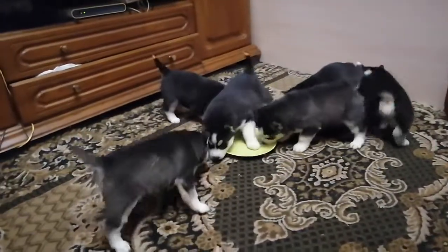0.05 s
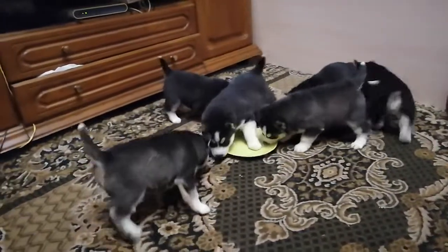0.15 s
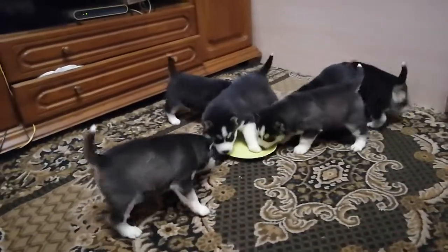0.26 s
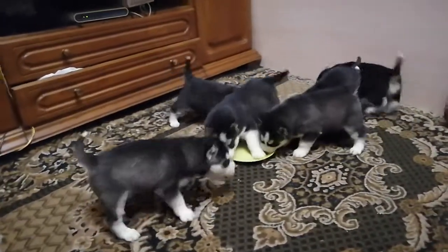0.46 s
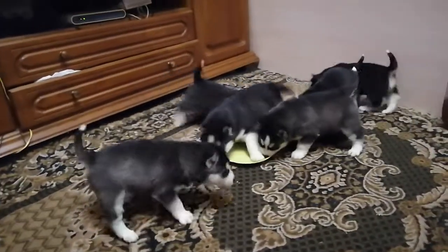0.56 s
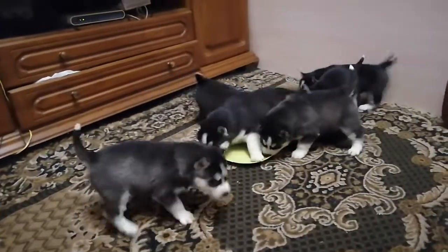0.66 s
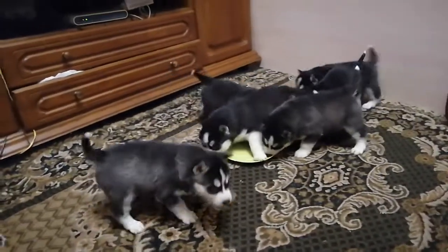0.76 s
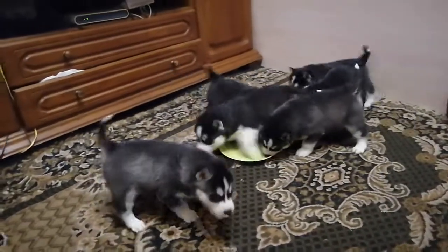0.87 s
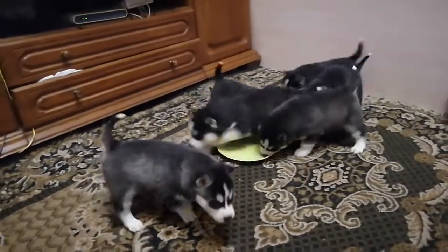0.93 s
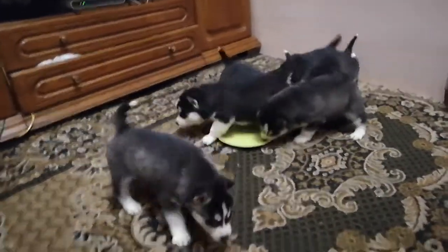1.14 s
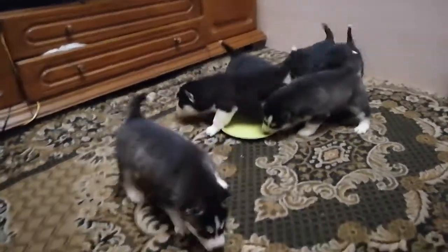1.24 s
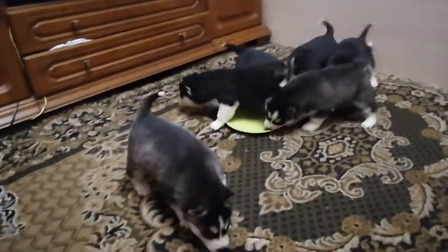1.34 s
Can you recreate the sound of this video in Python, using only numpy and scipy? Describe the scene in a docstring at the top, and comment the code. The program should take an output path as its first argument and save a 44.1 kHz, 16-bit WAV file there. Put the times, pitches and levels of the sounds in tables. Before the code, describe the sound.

Puppies yap close by in a small room with a slight echo. A lower yap at 0.2 seconds runs into a grumble and a shrill yap around 0.45. The loudest yap comes near 0.8 seconds, overlapped by a longer, hoarse one. A faint whimper follows at 1 second and a small yap at about 1.3. Paws thud and scuff softly on carpet underneath.

```python
"""In a small carpeted room, puppies yap over one another around a dish.
Each yap is a rising and falling tone from the vocal folds, shaped by the throat and mouth;
the loud ones start clear and turn hoarse. Walls and furniture echo the calls.
Paws thud and scuff on the carpet over the faint, steady noise of the room."""
import sys
import numpy as np
from scipy import signal
from scipy.fft import rfft, irfft, next_fast_len
from scipy.io import wavfile
from scipy.ndimage import uniform_filter1d, minimum_filter1d

SR = 44100
rng = np.random.default_rng(int(sys.argv[2]) if len(sys.argv) > 2 else 0)


def transcribe(signal):
    """Save signal, clipped to [-1, 1], as a 16-bit WAV file at the path in sys.argv[1]."""
    frames = np.atleast_2d(signal).T
    limited = np.clip(frames, -1, 1)
    pcm = np.round(limited * 32767).astype(np.int16)
    wavfile.write(sys.argv[1], SR, pcm)


N = 61739

# Tone colours of the background, the carpet noises and the difference between left and right.
# Each row: frequency in Hz, gain in dB.
ROOM_TONE = [(20, -13.5), (60, -2.5), (110, -13.5), (250, -28.5), (450, -29), (700, -32.5), (1200, -29.5),
             (2200, -28), (3500, -39.5), (9000, -46.5), (15000, -59)]
THUD_RUSTLE = [(25, -28), (70, -1), (130, -5), (300, -15), (600, -23), (2000, -62.5)]
SCUFF_COLOUR = [(100, -17.5), (250, 2), (650, 9.5), (950, -6), (1600, -11), (3000, -34.5), (8000, -45.5),
                (15000, -57.5)]
SIDE_COLOUR = [(100, -2.5), (300, -2.5), (700, -1.5), (1200, 0)]
# First echoes from floor, cabinet and walls. Each row: left delay in ms, right delay in ms, gain.
ECHOES = [(2.3, 2.9, 0.25), (6.4, 0.63, 0.037), (10.7, 16, 0.25), (17.3, 12, 0.23)]
# The room's lingering wash of echoes, and one thin tone that rings on with it.
# Each row: frequency in Hz, seconds for the lingering sound to fade by 60 dB, relative level in dB.
TAIL = [(150, 0.67, 3.5), (493, 1, -9.5), (1200, 0.31, 4.5), (2400, 0.3, 9), (4950, 0.94, -16.5),
        (8930, 0.36, 8.5)]
RINGS = [(3027, 0.3, -19.5)]
# Paw steps. Each row: time of the peak in seconds, pitch in Hz, level in dB, swell time in seconds.
THUDS = [(0.03, 68.1, -48, 0.077), (.038, 225, -41, 0.012), (0.344, 68.7, -41.5, 0.011),
         (0.395, 100.3, -46, 0.018), (0.738, 66, -40, 0.028), (0.999, 65.7, -61, 0.024),
         (1.049, 63.6, -49, 0.046), (1.085, 156, -39.5, 0.017), (1.175, 72.4, -42.5, 0.039),
         (1.218, 162, -48, 0.018), (1.276, 66.1, -53, 0.043)]
# Rubs on the carpet and at the dish.
# Each row: start in seconds, relative level in dB, fade time in seconds, treble boost in dB.
SCUFFS = [(0.009, -41, 0.015, 8.5), (0.026, -40, 0.0083, 7.5), (0.063, -49.5, 0.012, 17),
          (0.534, -44, 0.012, -22), (0.558, -38, 0.028, -13), (0.582, -39, 0.02, -42.5),
          (1.149, -46, 0.01, 19.5), (1.209, -55.5, 0.041, 0)]
# How each voice sound moves. Each row: time in seconds, pitch in Hz, relative level in dB,
# treble boost in dB, roughness from 0 to 1.
LOW_YAP = [(.176, 330, -42.5, -24, 0.09), (.187, 395.1, -35, -21.5, 0.16), (.195, 449.6, -32, -21, 0),
           (.200, 644.5, -24, -23.5, 0.22), (.205, 690, -24, -21.5, 0.25), (.209, 712, -26, -5, 0.25),
           (.220, 750, -24, -4, 0.19), (.236, 812, -26.5, 11.5, 0.2), (.243, 791.3, -27, 2, 0.58),
           (.266, 773.5, -24.5, -8, 0.83), (.272, 750, -35, -4.5, 0.65)]
GRUMBLE = [(.268, 344.3, -28.5, 0.0057, 0.041), (.282, 388.5, -26.5, 0.01, 0.057),
           (.302, 492.2, -33, 0, 0.34), (.322, 557.2, -25, 0.016, 0.13), (.345, 579.2, -33, 0.0056, 0.8),
           (.381, 671.3, -34.5, 0, 0.85), (.395, 530.2, -24, 0, 0.19), (.435, 455.5, -38, 0, 1)]
SHRILL_YAP = [(.348, 920, -40, -17.5, 0.28), (.366, 1044, -28.5, -35.5, 0.042),
              (.392, 919.7, -39, -21.5, 0.55), (.412, 1023, -21, -6.5, 0.076),
              (.430, 1121, -14.5, -4.5, 0.15), (.445, 1219, -16.5, 3, 0.38), (.456, 1284, -17.5, 12, 0.19),
              (.463, 1374, -10.5, -10.5, 0.16), (.474, 1501, -24.5, 10, 0.08),
              (.486, 1499, -25.5, 12.5, 0.13), (.495, 1361, -19.5, 1.5, 0.22), (.509, 1334, -29, -22, 0.5)]
LOUD_YAP = [(.697, 658, -48.5, -26.5, 0.047), (.708, 797, -37.5, 10, 0.078),
            (.717, 917.6, -36.5, 9.5, 0.079), (.729, 979.6, -35.5, 18, 0.14),
            (.737, 1062, -16.5, 0.5, 0.079), (.749, 1265, -10, 0.5, 0.057), (.760, 1409, -13, -1.5, 0.06),
            (.772, 1455, -18.5, 5.5, 0.088), (.785, 1280, -7, -6, 0.021), (.793, 1245, -10.5, -14.5, 0.11)]
LOUD_YAP_UNDERTONE = [(.722, 579.6, -31.5, -10, 0.4), (.738, 574, -40, -7, 1),
                      (.752, 600, -24, -10.5, 0.28), (.768, 611, -31.5, -0.5, 0.074)]  # a low tone near 600 Hz beneath the loud yap
LONG_YAP = [(.762, 994, -22, -18, 0.35), (.796, 1070, -19, -1, 0.65), (.812, 1260, -15, -8, 0.22),
            (.821, 1370, -23, 5, 0.22), (.833, 1540, -23, 3, 0.2), (.855, 1590, -27, 4, 0.22),
            (.874, 1500, -36, 11, .3), (.879, 1190, -24, -6, .05), (.898, 1040, -26.5, -4, 0.04),
            (.912, 880, -38, 2, 0.06)]
WHIMPER = [(.966, 645.4, -53.5, 0, 0.33), (.99, 712.7, -43, 0, 0.41), (1.035, 696.5, -49.5, 0.0095, 0.18),
           (1.06, 681, -61, 0, 0.31)]
SMALL_YAP = [(1.227, 750, -38.5, 1, 0.22), (1.236, 823, -32.5, 0, .1), (1.249, 900, -25, -3, 0.048),
             (1.265, 1003, -29, 4.5, 0.035), (1.278, 1006, -19, -9, 0.027), (1.290, 1036, -38, 11, .08)]
# How throat and mouth colour the calls. Each row: frequency in Hz, gain in dB.
LOW_THROAT = [(250, -36), (400, 2), (750, -0.5), (1100, 1.5), (1480, -3), (1850, -13.5), (2600, -19),
              (3250, -6), (4000, -17), (4850, -10.5), (5800, -21), (7400, -19), (10000, -38), (15000, -69)]
GRUMBLE_THROAT = [(200, -29), (400, -7.5), (700, -0.5), (1100, -6.5), (1400, -5), (1800, -41), (3000, -42),
                  (4400, -23), (7000, -37.5), (15000, -58)]
SHRILL_THROAT = [(300, -22.5), (700, -19.5), (1050, 0.5), (1450, -1), (1800, -7.5), (2500, -26),
                 (3000, -16.5), (3450, -18), (4400, -14.5), (5400, -14), (6200, -30.5), (8500, -36.5),
                 (15000, -71)]
LOUD_THROAT = [(400, -46), (650, 10), (1050, 0), (1450, -1.5), (1900, -6), (2650, -19.5), (3200, -11),
               (4300, -13.5), (5500, -8.5), (8500, -39), (10500, -48.5), (15000, -77)]
LONG_THROAT = [(450, -44.5), (750, -27.5), (980, 1.5), (1580, -4.5), (2000, -18), (2450, -14.5),
               (3150, -1.5), (3700, -4.5), (4700, -1.5), (6200, -19), (8500, -38.5), (15000, -69)]
CLOSED_THROAT = [(200, -20.5), (380, 0), (650, 0), (950, 0), (2000, -24), (15000, -55.5)]
SMALL_THROAT = [(300, -20), (750, -0.5), (1000, -5.5), (1700, -3), (2050, -24.5), (2700, -47),
                (3900, -20.5), (5000, -17.5), (6200, -32), (7500, -29), (10000, -77), (15000, -72.5)]
# The calls and the loud yap's undertone. Each row: movement table, throat table, left over right in dB,
# left delay in ms, echo in dB, share of half-pitch tones, mouth resonance in Hz, its boost in dB,
# top of the clear overtones in Hz.
VOICE_SOUNDS = [(LOW_YAP, LOW_THROAT, 0.44, 0.032, -5, 0.17, 8300, 0.68, 6500),
                (GRUMBLE, GRUMBLE_THROAT, -1.2, 0.14, -1.4, 0.81, 2600, 0.95, 7500),
                (SHRILL_YAP, SHRILL_THROAT, 1.3, 0.0092, -3.5, 1, 4980, 8.2, 8000),
                (LOUD_YAP, LOUD_THROAT, 1.1, 0.271, -5, 0.44, 4470, 9.9, 4660),
                (LOUD_YAP_UNDERTONE, CLOSED_THROAT, -1.6, 0.096, -12.5, .3, 600, 0, 6000),
                (LONG_YAP, LONG_THROAT, -8, 0.286, -2.5, 0.78, 10000, 1.3, 2970),
                (WHIMPER, CLOSED_THROAT, 0, 0.07, -2.9, 0.11, 3300, 3.4, 6000),
                (SMALL_YAP, SMALL_THROAT, 0.53, 0.058, -5, 0.125, 1800, 0, 9300)]

TOP_HZ = 15000
FREQS = np.arange(N // 2 + 1) * SR / N


def undb(db):
    """Turn decibels into a gain to multiply by."""
    return 10 ** (np.asarray(db) / 20)


def unit(x):
    """Scale a sound to an average power of 1."""
    return x / np.sqrt(np.mean(x ** 2) + 1e-18)


def gain_at(points, hz):
    """Read the gain of a tone colour table at the given frequencies."""
    f, db = np.array(points, float).T
    return undb(np.interp(np.log(hz + 1), np.log(f), db))


def colour(x, points):
    """Give a sound the tone colour in a table."""
    return irfft(rfft(x) * gain_at(points, FREQS), N)


def noise(points):
    """Make noise with the tone colour in a table."""
    return unit(colour(rng.standard_normal(N), points))


def treble_share(hz):
    """How much a frequency counts as treble: rises from 0 to 1 around 2200 Hz."""
    return 1 / (1 + (2200 / (hz + 1)) ** 6)


def brighten(x, treble_db):
    """Raise or lower the treble of a sound."""
    treble = irfft(rfft(x) * treble_share(FREQS), N)
    return x + (undb(treble_db) - 1) * treble


def wander(rate):
    """A smooth random wobble that changes about rate times a second."""
    return unit(irfft(rfft(rng.standard_normal(N)) / (1 + (2 * FREQS / rate) ** 2), N))


def delay(x, ms):
    """Make a sound arrive ms milliseconds later."""
    size = next_fast_len(N + 4096)
    hz = np.arange(size // 2 + 1) * SR / size
    return irfft(rfft(x, size) * np.exp(-2j * np.pi * hz * ms / 1000), size)[:N]


def room_tone():
    """A faint, steady rumble and hiss, a little different on each side."""
    middle, side = noise(ROOM_TONE), noise(ROOM_TONE)
    return undb(-58.5) * (middle + 0.51 * np.array([side, -side]))


def room_echoes(x):
    """Walls and furniture send back a few echoes, then a wash that drops quickly and lingers softly."""
    size = 32768
    t, f = np.arange(size) / SR, np.arange(size // 2 + 1) * SR / size
    hiss = rfft(rng.standard_normal((2, size)))
    centres = np.log([row[0] for row in TAIL])
    onset = np.clip(t / 0.0041 - .5, 0, 1)
    quick_drop = 8.1 * 1000 ** (-t / 0.2)  # falls 60 dB in 0.2 seconds
    tail = 0
    for this_band, (_, fade_s, db) in zip(np.eye(len(TAIL)), TAIL):
        band = irfft(hiss * np.interp(np.log(f + 1), centres, this_band))
        fade = (1000 ** (-t / fade_s) + quick_drop) * onset
        tail = tail + undb(db) * band * fade / np.sqrt(np.sum(fade ** 2))
    for hz, fade_s, db in RINGS:
        ring = 1000 ** (-t / fade_s) * np.sin(2 * np.pi * (hz * t + rng.random((2, 1))))
        tail = tail + undb(db) * unit(ring) / np.sqrt(size)
    early = sum(gain * np.array([delay(x, left), delay(x, right)]) for left, right, gain in ECHOES)
    return early + signal.fftconvolve(x[None], tail, axes=1)[:, :N]


def paw_thuds(t):
    """Each step makes the floor thud, with a dull rustle of the carpet."""
    thuds, weight = 0, 0
    for peak, hz, db, swell_s in THUDS:
        press = undb(db) * np.exp(-((t - peak) / swell_s) ** 2)
        thuds += press * np.sin(2 * np.pi * hz * (t - peak) + rng.uniform(0, 2 * np.pi))
        weight += press
    return thuds + undb(-9.5) * weight * noise(THUD_RUSTLE)


def scuffs(t):
    """Paws and muzzles rub, making short bursts of noise."""
    out, rise_s = 0, 0.012
    for start, db, fade_s, treble_db in SCUFFS:
        age = np.maximum(t - start, 0)
        burst = (1 - np.exp(-age / rise_s)) * np.exp(-age / fade_s)
        out += undb(db) * burst * brighten(noise(SCUFF_COLOUR), treble_db)
    return 2 * out


def yap(t, curve, throat, half_share, mouth_hz, mouth_db, clear_hz):
    """Vocal folds buzz through the throat and a mouth that opens with effort; rough ones shake and rasp."""
    times, *columns = np.array(curve, float).T
    hz, db, treble_db, rough = (np.interp(t, times, column) for column in columns)
    attack_s, release_s, mouth_width_hz = .003, .005, 450
    before, after = np.maximum(times[0] - t, 0), np.maximum(t - times[-1], 0)
    fade = np.exp(-(before / attack_s) ** 2 - (after / release_s) ** 2)
    shaky_hz = hz * (1 + 0.0845 * rough * wander(870))
    phase = 2 * np.pi * np.cumsum(shaky_hz) / SR
    on, tone = fade > 1e-4, np.zeros(N)
    effort_db = db[on] - db.max()  # 0 at the call's height, negative elsewhere
    resonance_hz = mouth_hz * 2 ** (.02 * effort_db)
    for multiple in np.arange(1, 49) / 2:
        f = multiple * hz[on]
        treble = treble_share(f)
        strength = gain_at(throat, f) * (1 + (undb(treble_db[on]) - 1) * treble)
        strength *= (f < TOP_HZ) / np.sqrt(1 + (f / clear_hz) ** 12)
        strength *= undb(0.21 * effort_db * np.log2(max(multiple, 1)))  # softer is duller
        if multiple % 1:  # rough folds alternate strong and weak beats, adding half-pitch tones
            strength *= half_share * rough[on] * (1 + 0.87 * treble)
        mouth = undb(mouth_db / (1 + ((f - resonance_hz) / mouth_width_hz) ** 4))
        tone[on] += strength * mouth * np.sin(multiple * phase[on] + rng.uniform(0, 2 * np.pi))
    puffs = rng.standard_normal(N) * (1 + np.cos(phase))  # one puff for each beat of the folds
    rasp = brighten(unit(colour(puffs, throat)), treble_db + 2.5)
    # Air hisses in the throat above the last clear overtones.
    air = signal.sosfilt(signal.butter(4, clear_hz, "high", fs=SR, output="sos"), rasp)
    flutter = 1 + rough * wander(180)
    return fade * undb(db) * (tone * flutter + 0.7 * rough * rasp + 0.3 * air)


def puppies(t):
    """Every call arrives straight from the puppy and again as echoes."""
    out = 0
    for curve, throat, pan_db, lag_ms, echo_db, *voice_settings in VOICE_SOUNDS:
        voice = yap(t, curve, throat, *voice_settings)
        direct = np.array([delay(voice, lag_ms) * undb(pan_db / 2), voice * undb(-pan_db / 2)])
        out += direct + undb(echo_db) * room_echoes(voice)
    return out


def scene():
    """Add up the yaps, the scuffs and their echoes, the steps and the background."""
    t = np.arange(N) / SR
    rubs = scuffs(t)
    return puppies(t) + rubs + undb(-1.5) * room_echoes(rubs) + paw_thuds(t) + room_tone()


def record(dry):
    """Two close microphones hear the bass alike; the highest peaks are held down and the top is cut."""
    middle = (dry[0] + dry[1]) / 2
    side = colour((dry[0] - dry[1]) / 2, SIDE_COLOUR)
    pair = np.array([brighten(middle + side, 1.25), brighten(middle - side, -1.25)])  # left is brighter
    safe_gain = np.minimum(1, .84 / (np.abs(pair).max(axis=0) + 1e-9))
    limiter = uniform_filter1d(minimum_filter1d(safe_gain, 221), 221)  # smoothed over 5 ms
    return signal.sosfilt(signal.ellip(8, .2, 70, TOP_HZ, fs=SR, output="sos"), pair * limiter)


dry = scene()
out = record(dry)
transcribe(out)
```